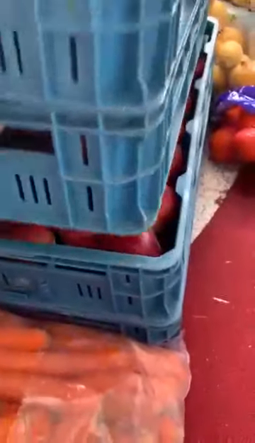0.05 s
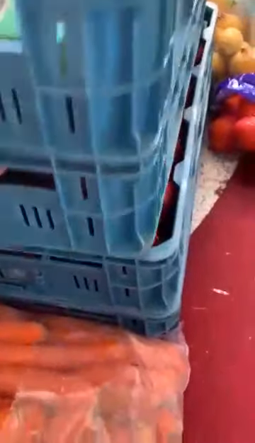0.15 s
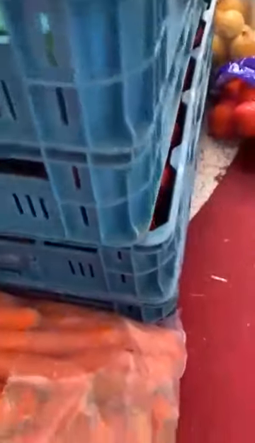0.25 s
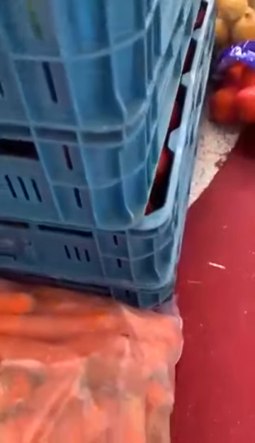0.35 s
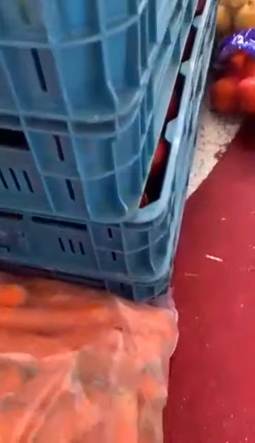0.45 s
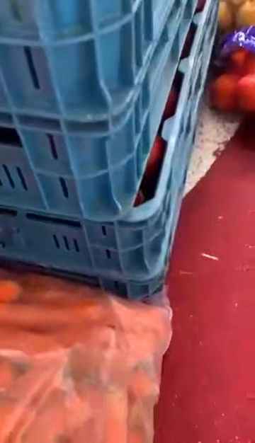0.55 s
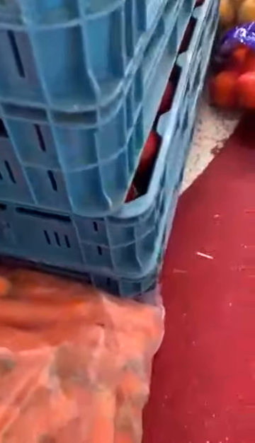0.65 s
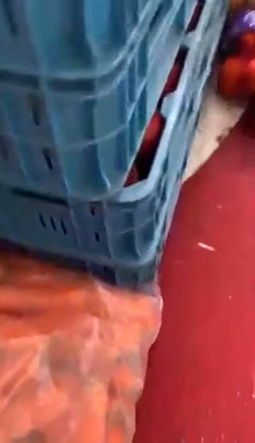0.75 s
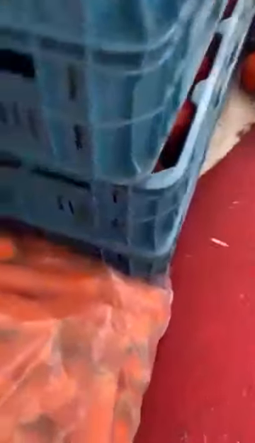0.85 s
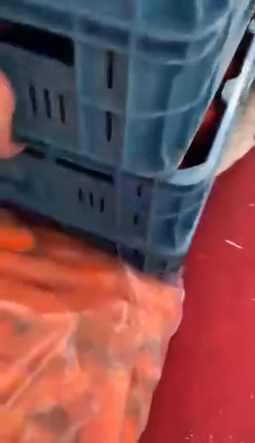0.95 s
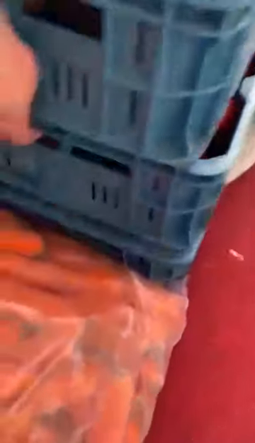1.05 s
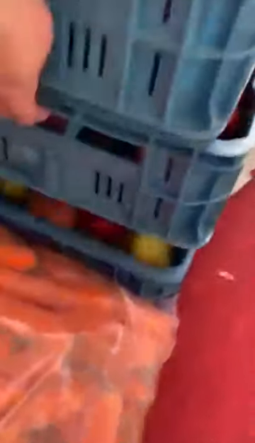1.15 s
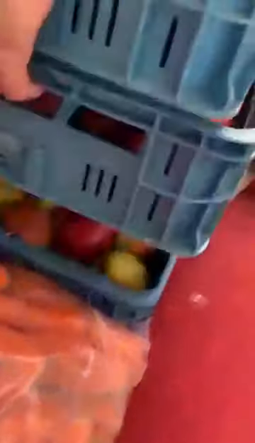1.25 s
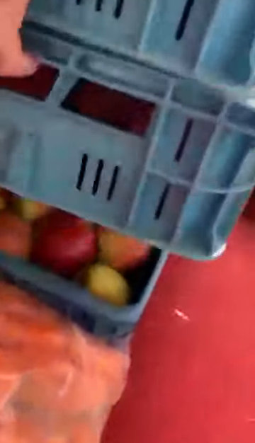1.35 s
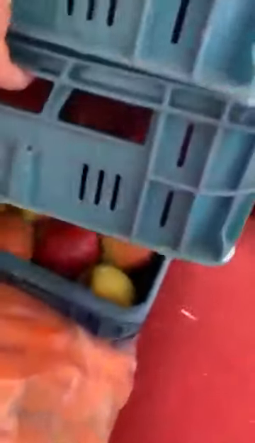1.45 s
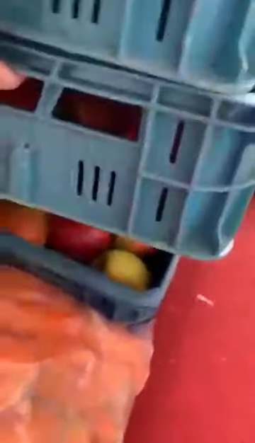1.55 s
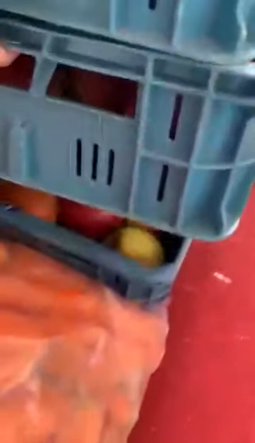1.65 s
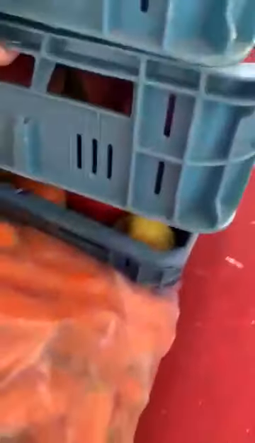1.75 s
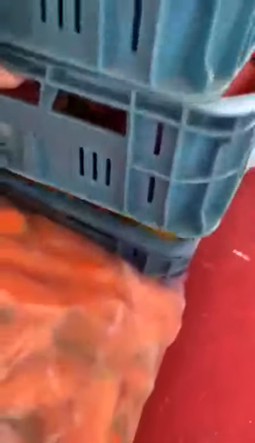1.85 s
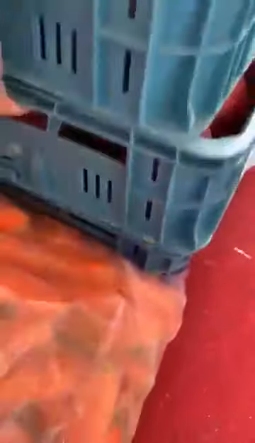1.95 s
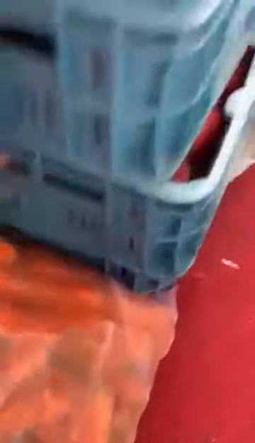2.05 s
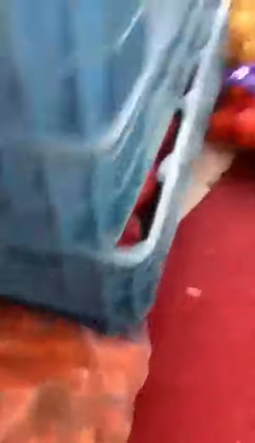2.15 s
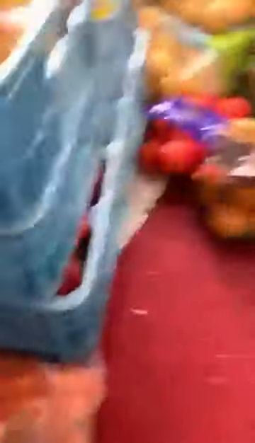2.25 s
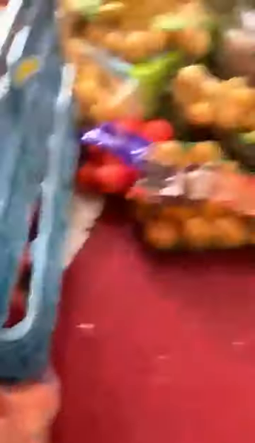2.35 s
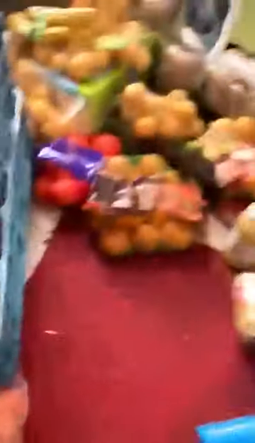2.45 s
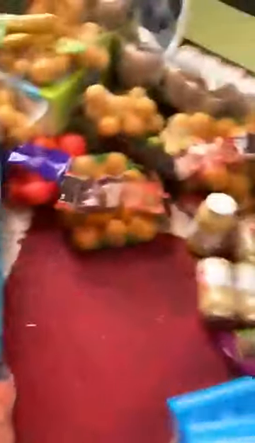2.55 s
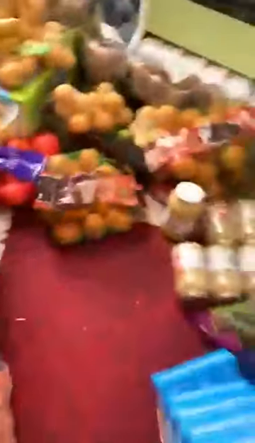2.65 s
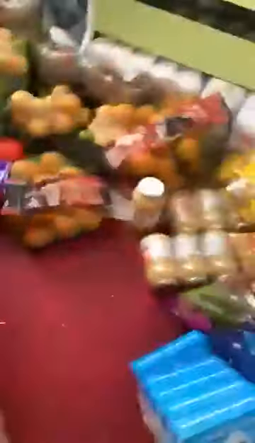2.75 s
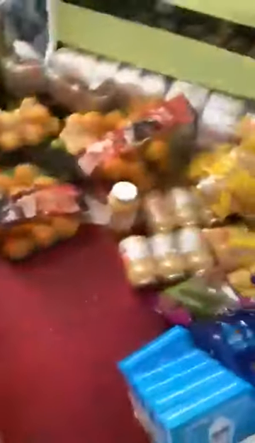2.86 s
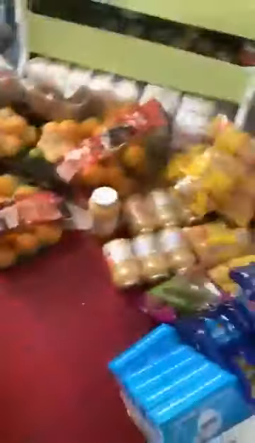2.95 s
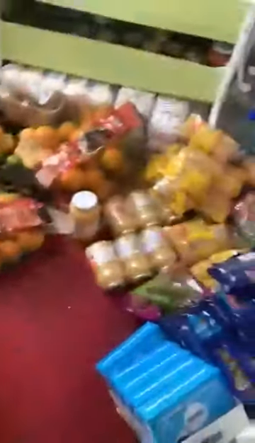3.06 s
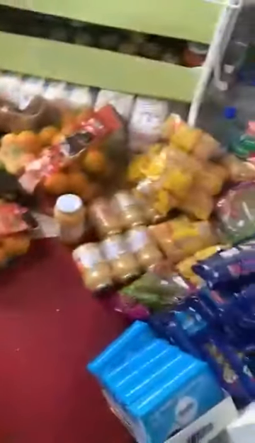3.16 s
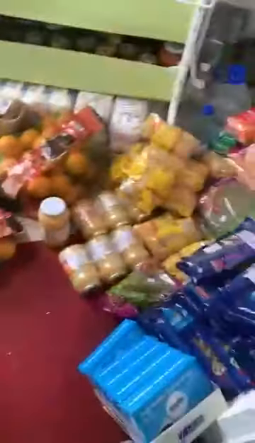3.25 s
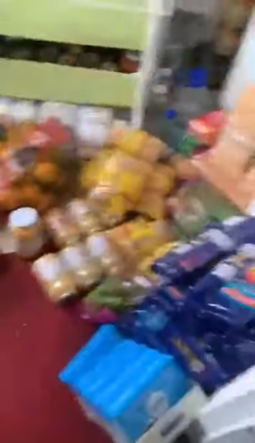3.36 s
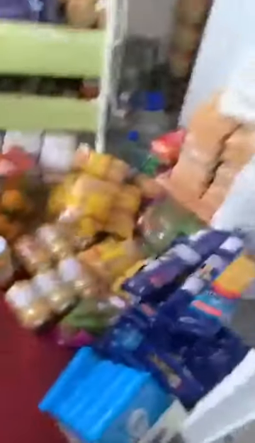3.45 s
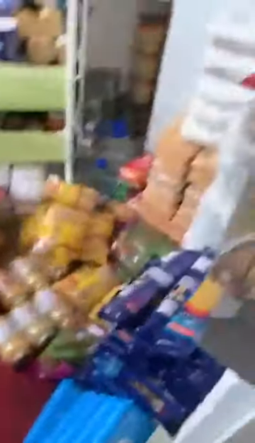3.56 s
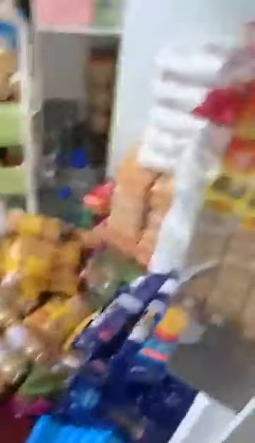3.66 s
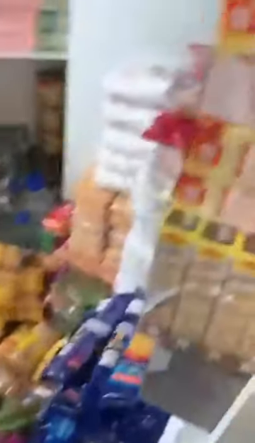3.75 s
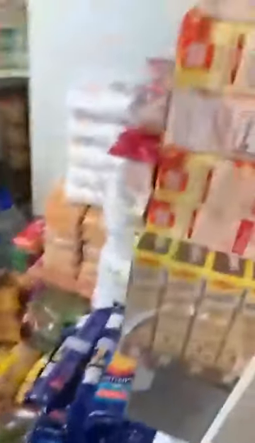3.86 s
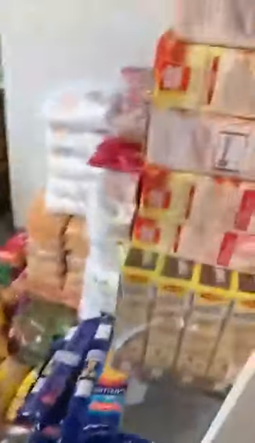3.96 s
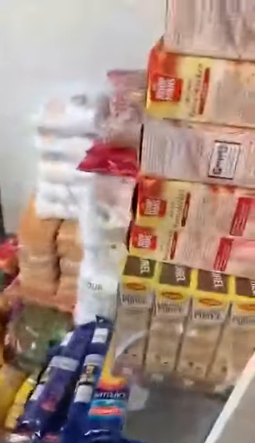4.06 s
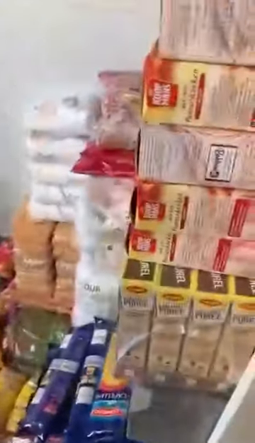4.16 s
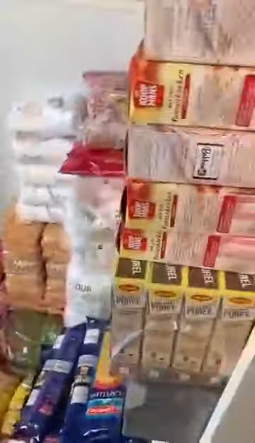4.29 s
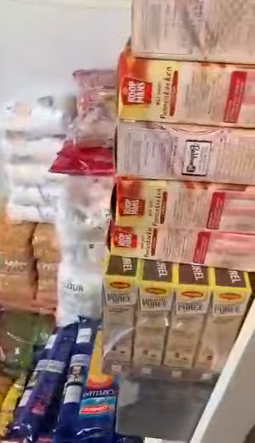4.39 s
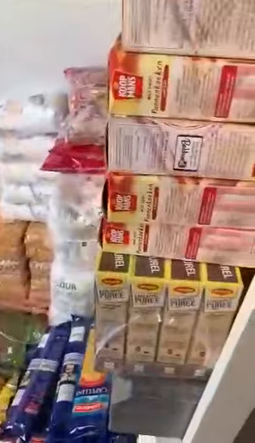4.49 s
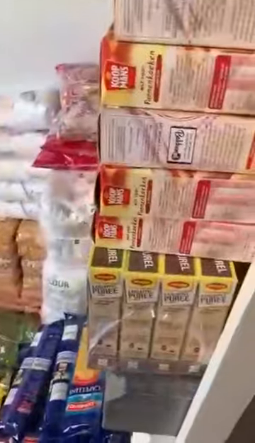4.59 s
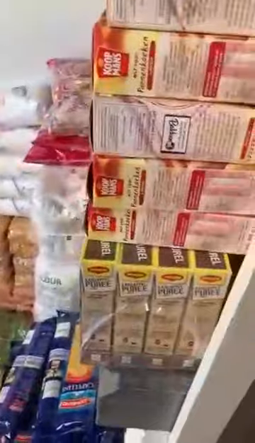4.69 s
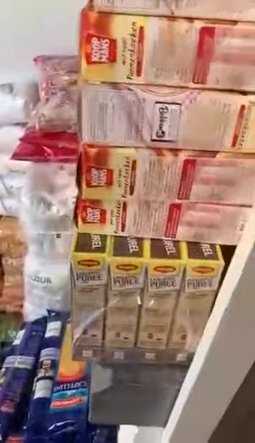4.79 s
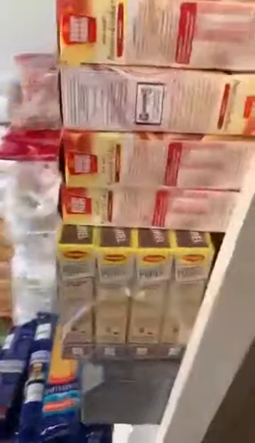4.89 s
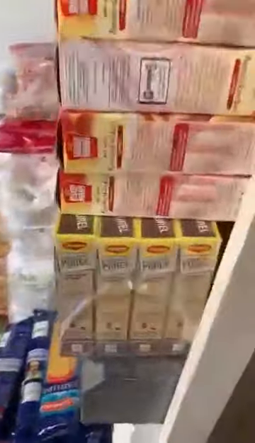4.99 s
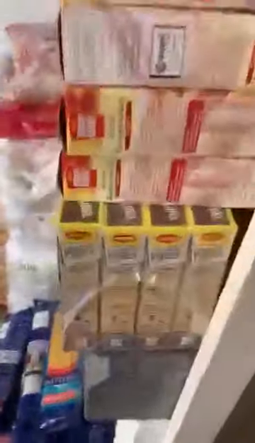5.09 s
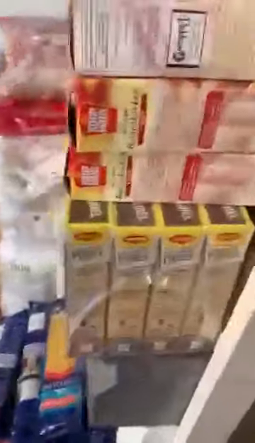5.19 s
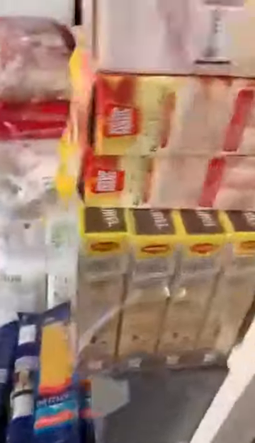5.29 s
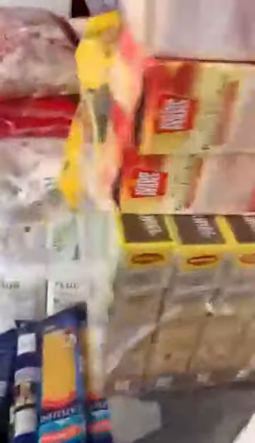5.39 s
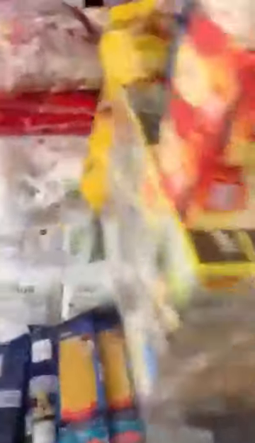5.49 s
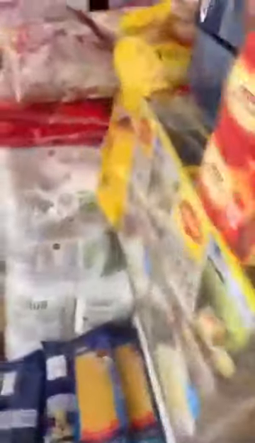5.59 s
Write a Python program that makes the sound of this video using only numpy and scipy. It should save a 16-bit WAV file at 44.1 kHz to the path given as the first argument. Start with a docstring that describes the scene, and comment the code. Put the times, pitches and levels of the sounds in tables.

```python
"""A small store room: stacked plastic produce crates are lifted, knocked together and dragged rim over rim.
Each contact sums decaying noise and wall modes into a thud of the loaded crate, a clack and a sharp crack;
a knock adds a bending wave and a panel note, and sliding is a stick-slip run of tiny contacts.
As the handling thins out, rustles, shuffling, a faint whistle and crinkling film remain, with two faint knocks.
Filtered noise makes the room tone and the rumble; a close pair of microphone ports hears it all."""
import sys
import numpy as np
from scipy import signal
from scipy.fft import rfft, irfft
from scipy.io import wavfile
from scipy.ndimage import uniform_filter1d

SR = 44100
rng = np.random.default_rng(int(sys.argv[2]) if len(sys.argv) > 2 else 0)


def wav_record(signal):
    """Record a signal, one row per channel, as 16-bit PCM in the file named by sys.argv[1]."""
    frames = np.transpose(np.atleast_2d(signal))
    bounded = np.clip(frames, -1, 1)
    # unit amplitude maps onto the largest positive 16-bit level
    quanta = np.round(bounded * 32767).astype(np.int16)
    wavfile.write(sys.argv[1], SR, quanta)


N = 248264  # length in samples


def gain_of(db):
    """Logarithmic level: turns decibels into an amplitude gain."""
    return 10 ** (np.asarray(db) / 20)


def evened(x):
    """Power normalisation: scales a signal to rms 1."""
    return x / np.sqrt(np.mean(x ** 2) + 1e-20)


def read(points, hz, axis=1):
    """Logarithmic pitch scale: joins one column of a table along a log-frequency axis."""
    columns = np.transpose(points)
    return np.interp(np.log(hz + 1), np.log(columns[0] + 1), columns[axis])


def add(mix, s, sound):
    """Superposition: adds a sound to the mix from a time in seconds."""
    part = mix[:, max(round(s * SR), 0):][:, :sound.shape[1]]
    part += sound[:, :part.shape[1]]


def level(curve):
    """Amplitude envelope: a curve of (s, dB), as a gain for every sample."""
    return gain_of(np.interp(np.arange(N) / SR, *np.transpose(curve)))


def decay(t, t60):
    """Exponential damping: the amplitude falls 60 dB in t60 seconds."""
    return np.exp(-np.log(1000) * t / np.maximum(t60, 1e-3))


def noise(spectrum, size, lumps_db=0, lump_hz=130):
    """Spectral shaping: two unrelated noises of one colour share the chance resonances of the struck spot."""
    hz = np.fft.rfftfreq(size, 1 / SR)
    spot = np.sqrt(hz * 1000) / lump_hz  # resonances widen towards the treble
    heights = np.clip(rng.standard_normal(256), -2, 2)
    lumps = np.interp(spot, np.arange(len(heights)), heights)
    shape = gain_of(read(spectrum, hz) + lumps_db * lumps)
    white = rng.standard_normal((2, size))
    return evened(irfft(rfft(white) * shape, size))


def drifting(colour, patchy_db, patch_s, patch_hz):
    """Time-frequency modulation: the bands of a coloured noise swell and fade in chance patches."""
    hz, t, z = signal.stft(noise(colour, N), SR, nperseg=1024, noverlap=768)
    patches = rng.standard_normal((len(t), len(hz))).T
    for _ in range(2):
        patches = uniform_filter1d(patches, max(round(patch_s / t[1]), 1), axis=1)
        patches = uniform_filter1d(patches, max(round(patch_hz / hz[1]), 1), axis=0)
    z = z * gain_of(patchy_db * np.clip(evened(patches), -2, 2))
    return evened(signal.istft(z, SR, nperseg=1024, noverlap=768)[1][:, :N])


# Reverberation of the room. Each row: frequency in Hz, decay time t60 in seconds.
ROOM_T60 = [(100, 0.31), (400, 0.24), (1200, 0.66), (2400, 1.3), (3900, 0.68), (7000, 1.1), (11000, 0.91)]


def room(x, gap=0.0035, build=0.0074):
    """Reverberation: a diffuse tail builds after a short gap (s) and dies at its own speed in each band."""
    hz, t, z = signal.stft(rng.standard_normal((2, SR)), SR, nperseg=256)
    z *= decay(t, read(ROOM_T60, hz)[:, None]) * np.clip((t - gap) / build, 0, 1)
    tail = signal.istft(z, SR, nperseg=256)[1]
    return signal.fftconvolve(x, tail / np.linalg.norm(tail[0]), axes=1)[:, :N]


# Spread of sound from all around. Each row: frequency in Hz, side minus mid level in dB.
WIDTH = [(60, -13), (110, -15.5), (190, -10.5), (340, -6.5), (610, 2.5), (1100, 3), (1960, 4.5),
         (3510, 2.5), (6270, -1), (11200, -7.5)]


def around(x):
    """Diffuse field: unrelated mid and side signals, narrow in the bass and wide above."""
    side = irfft(rfft(x[1]) * gain_of(read(WIDTH, np.fft.rfftfreq(N, 1 / SR))), N)
    return np.array([x[0] + side, x[0] - side])


# The port pair facing the crates; its differences fade out below 380 Hz.
# Each row: frequency in Hz, likeness from 0 to 1, left lead in radians.
PORTS = [(350, 0.96, 0.18), (650, 0.9, -0.5), (1193, 0.4, -.5), (2160, 0.5, -0.48), (2630, 0.6, 3),
         (3962, 0.3, 2), (4870, 0.97, 3), (5500, 1, 3.5), (6000, .93, 4.5), (7100, 0.4, 7.5),
         (9900, .95, 6.5), (10260, 1, 7.5), (11450, 1, 10)]
# Level balance of the ports. Each row: frequency in Hz, left minus right in dB.
LEAN = [(130, -1), (260, -.5), (560, 1), (1200, -1), (2500, -1.5), (5000, 0.03)]


def near(x):
    """Coherence of a close source: the ports hear the bass alike and the treble with shifting phase."""
    hz = np.fft.rfftfreq(2 * N, 1 / SR)
    short_waves = hz ** 6 / (hz ** 6 + 380 ** 6)  # only these differ between the ports
    likeness = 1 - short_waves * (1 - np.clip(read(PORTS, hz), 0, 1))
    lead = short_waves * read(PORTS, hz, axis=2)
    common, apart = rfft(x, 2 * N) * np.sqrt([(1 + likeness) / 2, (1 - likeness) / 2])
    lean = gain_of(read(LEAN, hz) / 2)
    left = (common + apart) * lean
    right = (common - apart) * np.exp(-1j * lead) / lean
    return irfft(np.array([left, right]))[:, :N]


# Colour of the room tone. Each row: frequency in Hz, relative density in dB per Hz.
AIR = [(25, -14.5), (50, -3.5), (90, 2), (150, -8.5), (300, -10), (700, -18.5), (1600, -27.5), (2700, -38),
       (3900, -40), (5200, -49), (7000, -43), (11000, -49)]
AIR_DB = -58.5


def room_tone():
    """Stationary background noise: a low tone of the room whose bands swell and fade slightly."""
    return gain_of(AIR_DB) * drifting(AIR, patchy_db=2.5, patch_s=0.064, patch_hz=200)


# Deep rumble over time. Each row: time in seconds, level in dB.
RUMBLE = [(0, -60.5), (1.901, -51), (2.2, -53), (2.6, -66), (3.6, -65.5), (4.2, -75), (4.9, -66.5)]
# Its colour. Each row: frequency in Hz, relative density in dB per Hz.
RUMBLE_COLOUR = [(20, -10.5), (55, 0), (100, -4), (180, -20), (600, -59.5)]


def rumble():
    """Low-frequency noise, alike at both ports: it comes and goes as the microphone is carried about."""
    return level(RUMBLE) * noise(RUMBLE_COLOUR, N)[0]


# Low shuffling over time. Each row: time in seconds, level in dB.
SHUFFLE = [(2.5, -75), (2.9, -61), (3.1, -65.5), (3.37, -68), (3.6, -66.5), (4.35, -64), (4.6, -74.5),
           (5.15, -63.5), (5.63, -68)]
# Its colour. Each row: frequency in Hz, relative density in dB per Hz.
SHUFFLE_COLOUR = [(70, -18), (160, 2.5), (280, 2.5), (520, -6.5), (900, -17), (2000, -38)]
# Soft high swish over time. Each row: time in seconds, level in dB.
SWISH = [(2.15, -77), (2.42, -68), (2.95, -76), (3.15, -93), (3.44, -103.5), (3.52, -68), (3.82, -75),
         (4.6, -97.5)]
# Its colour. Each row: frequency in Hz, relative density in dB per Hz.
SWISH_COLOUR = [(2700, -14), (3400, 0.5), (4400, 0), (5000, -18), (6500, -14.5), (11000, -21.5)]


def movement():
    """Friction noise of moving about the room: a low patchy shuffling and a soft high swish."""
    low = level(SHUFFLE) * drifting(SHUFFLE_COLOUR, patchy_db=3.5, patch_s=0.043, patch_hz=90)
    return low + level(SWISH) * noise(SWISH_COLOUR, N)


WHISTLE_START_S, WHISTLE_END_S, WHISTLE_HZ, WHISTLE_DB = 3.5, 3.99, 1707, -77
WHISTLE_WIDTH_HZ = 45  # falloff to either side of its pitch; makes pitch and strength waver


def whistle():
    """Narrow-band noise: a faint, wavering thin tone swells and fades once."""
    t = np.arange(N) / SR
    arch = np.sin(np.pi * np.clip((t - WHISTLE_START_S) / (WHISTLE_END_S - WHISTLE_START_S), 0, 1))
    band = np.exp(-((np.fft.rfftfreq(N, 1 / SR) - WHISTLE_HZ) / WHISTLE_WIDTH_HZ) ** 2)
    tone = evened(irfft(rfft(rng.standard_normal((2, N))) * band, N))
    return gain_of(WHISTLE_DB) * arch * tone


# Crinkling wrapping film over time. Each row: time in seconds, level in dB.
CRINKLE = [(4.85, -105), (4.95, -71.5), (5.1, -77), (5.22, -68.5), (5.3, -66), (5.42, -64), (5.52, -69),
           (5.63, -79)]
# Its colour. Each row: frequency in Hz, relative density in dB per Hz.
CRINKLE_COLOUR = [(500, -13.5), (1500, 2), (2700, -2), (4200, 3.5), (5300, -13), (7000, -2), (9500, -9),
                  (11500, -18)]


def crinkle(snaps_per_s=1300, spread_db=2.0, snap_t60_s=.05, size=2048):
    """Buckling: wrapping film gives way in many tiny snaps of uneven size, whose powers add up."""
    sizes = gain_of(spread_db * np.minimum(rng.exponential(1, N), 3))
    snaps = sizes * (rng.random(N) < snaps_per_s / SR)
    fade = decay(np.arange(size) / SR, snap_t60_s)
    power = signal.oaconvolve(snaps ** 2, fade ** 2)[:N]
    texture = drifting(CRINKLE_COLOUR, patchy_db=0.5, patch_s=.035, patch_hz=400)
    return level(CRINKLE) * evened(np.sqrt(abs(power))) * texture


# Soft scuffs and ticks further off. Each row: start in seconds, level in dB, peak in Hz, height of the
# peak in dB, body in dB, treble in dB, rise in seconds, t60 in seconds.
RUSTLES = [(3.481, -48.5, 1680, 10, 5.5, -6, 0.017, 0.22), (4.122, -57, 1460, 3.5, -8, -0.5, 0.0019, 0.21),
           (4.174, -51, 1763, 0, 2, -7, 0.0097, 0.2), (4.271, -53, 1700, 6, -23, -6, 0.0038, 0.11),
           (4.282, -41, 1643, 5.5, -7.5, 6, 0.001, 0.13), (4.726, -47.5, 1146, 12, 13, 2, 0.012, 0.19),
           (5.256, -48.5, 1307, 6.5, 5, -3, 0.0092, 0.19), (5.262, -54, 2890, 22, -4, 0, 0.01, 0.21),
           (5.46, -57, 1254, -4, 5, -5, 0.0092, 0.22)]
# Colour common to all scuffs. Each row: frequency in Hz, relative density in dB per Hz.
SCUFF = [(60, -12), (300, -7), (800, -4.5), (1400, -1), (2600, -9.5), (3700, -8.5), (5200, -21),
         (7500, -14), (11000, -36.5)]
PEAK_OCTAVES = 0.17  # half-width of a scuff's resonance, at half its height in dB
BODY_HZ, TREBLE_HZ = 800, 4170  # below and above these a scuff's body and treble count


def rustles(grain_db=1.5, size=16384):
    """Resonant friction noise: short grainy puffs, each with one peak and its own body and treble."""
    t, out = np.arange(size) / SR, np.zeros((2, N))
    f = np.geomspace(40, 12000, 200)
    for s, db, hz, height, body, treble, rise, t60 in RUSTLES:
        peak = height / (1 + (np.log2(f / hz) / PEAK_OCTAVES) ** 2)
        shelves = body / (1 + (f / BODY_HZ) ** 4) + treble / (1 + (TREBLE_HZ / f) ** 4)
        colour = np.transpose([f, read(SCUFF, f) + peak + shelves])
        grain = gain_of(grain_db * evened(uniform_filter1d(rng.standard_normal(size), 150)))
        puff = evened(noise(colour, size, lumps_db=3.5, lump_hz=49.84) * grain)
        swell = (1 - np.exp(-(t / rise) ** 2)) * decay(t, t60)
        add(out, s, gain_of(db) * puff * swell / swell.max())
    return out


# The crate's crowded short resonances, deep, middle and high.
# Each row: frequency in Hz, relative density in dB per Hz.
THUD = [(25, -27.5), (60, -8.5), (110, 2.5), (180, 0.5), (260, 1), (400, -9), (520, -18), (900, -43.5)]
CLACK = [(250, -41.5), (430, -1.5), (540, 6), (820, -3.5), (1030, 2.5), (1350, -1.5), (2100, -6),
         (2800, -15.5), (4400, -14), (6500, -42.5)]
CRACK = [(1000, -30), (2400, 8), (3400, 2.5), (5000, 1.5), (6400, 2.5), (7600, 2.5), (9000, 0),
         (10500, -4.5), (11600, 0.5)]
# How thud, clack and crack swell and die.
# Each row: rise in seconds, t60 in seconds before the ring factor.
ENVELOPES = [(0.0027, 0.18), (0.00019, 0.17), (0.00078, 0.13)]
# Crate wall modes. Each row: frequency in Hz, relative level in dB, t60 in seconds before the ring factor.
MODES_OF_CRATE = [(173, 2.5, 0.15), (215.3, -2, 0.22), (245.4, -8, 0.18), (353.8, -1, 0.28),
                  (410.5, -1.5, 0.12), (517.7, -7, 0.38), (682, -3, 0.078), (953, -8.5, 0.2),
                  (1019.3, 0, 0.049), (1175, -9, 0.2), (1346, -8.5, 0.14), (1553, -11, 0.24),
                  (1678, -11.5, 0.29), (1870, -13.5, 0.058), (2190, -12.5, 0.12), (2420, -21, 0.4),
                  (3320, -17, 0.15)]
SNAP_DB, SNAP_S = 0, 0.005  # the first instant of a crack stands out above its ring


def contact(ring, modes_db=-7, lumps_db=(5, 6.5, 4), size=20480):
    """Modal excitation: thud, clack and crack of one contact, each of rms 1 over its first 20 ms."""
    t = np.arange(size) / SR
    parts = []
    for colour, lumps, (_, t60) in zip((THUD, CLACK, CRACK), lumps_db, ENVELOPES):
        parts.append(noise(colour, size, lumps, lump_hz=54.85) * decay(t, t60 * ring))
    parts = np.array(parts)
    for hz, db, t60 in MODES_OF_CRATE:
        # each place of contact wakes the wall modes differently; the low ones belong to the thud
        detuned = hz * (1 + 0.0028 * rng.standard_normal())
        phase = 2 * np.pi * (detuned * t + rng.random((2, 1)))
        strength = gain_of(db + modes_db) * (.5 + rng.random())
        parts[int(hz > 450)] += strength * np.sin(phase) * decay(t, t60 * ring)
    parts[2] *= 1 + gain_of(SNAP_DB) * np.exp(-t / SNAP_S)
    for part, (rise, _) in zip(parts, ENVELOPES):
        part *= 1 - np.exp(-(t / rise) ** 2)
        part /= np.sqrt(np.mean(part[:, :SR // 50] ** 2, axis=1, keepdims=True))
    return parts


# Dry ticks of a plastic edge. Each row: start in seconds, level in dB before the doubling in ticks().
TICKS = [(1.525, -36), (1.8497, -26.5), (1.978, -37), (2.004, -38.5), (2.22, -52.5), (5.2306, -59)]
TICK_T60_S = 0.044


def ticks(size=4096):
    """Impulsive excitation: an edge flicks past a rib, all crack and no weight."""
    t, out = np.arange(size) / SR, np.zeros((2, N))
    for s, db in TICKS:
        crack = noise(CRACK, size, lumps_db=1.5) * decay(t, TICK_T60_S)
        add(out, s, 2 * gain_of(db) * crack)
    return out


# Drags of rim over rim. Each row: start of full speed in seconds, length in seconds, friction in dB,
# load on the crate in dB.
DRAGS = [(0, 0.0048, -35, -0.5), (0.224, 0.017, -25, 3), (0.411, 0.048, -40.5, 3), (0.63, 0.01, -48.5, -4),
         (0.925, 0.014, -50.5, 0), (1.02, 0.12, -42, -4), (1.264, 0.14, -26, -0.5), (1.376, 0.048, -26, -4),
         (1.47, 0.04, -33, -3), (1.856, 0.023, -26, -7), (1.931, 0.051, -35.5, -1), (2.12, 0.04, -55, 2)]
GRIP_DB_PER_S, EASE_DB_PER_S = 420.5, 132.5  # a drag builds quickly and runs out slowly
SHARP_DB, DULLING = -4.5, 0.87  # crack of an unloaded slip, and the dB it loses per dB of load
LIGHTEN_DB_PER_S = 14  # the hands take the weight as a drag runs out
GRAZE_DB, GRAZE_DB_PER_S = -7.5, 1701  # the rims graze each other for an instant around each knock


def drag_force():
    """Dry friction: drags grip, hold and run out, forcing thud, clack and crack; load deepens and dulls."""
    t, power = np.arange(N) / SR, np.zeros((3, N))
    for s, length, db, weight in DRAGS:
        before, after = np.maximum(s - t, 0), np.maximum(t - s - length, 0)
        friction = db - GRIP_DB_PER_S * before - EASE_DB_PER_S * after
        load = weight - LIGHTEN_DB_PER_S * after
        power += gain_of([friction + load, friction, friction + SHARP_DB - DULLING * load]) ** 2
    for s, db, weight, sharpness, _ in KNOCKS:
        close = abs(t - s) < .04
        graze = db + GRAZE_DB - GRAZE_DB_PER_S * abs(t[close] - s)
        power[:, close] += gain_of([graze + weight, graze, graze + sharpness]) ** 2
    return np.sqrt(power)


CATCH_DB, CATCH_S = 1.5, .014  # the ribs catch and let go during a drag


def slide(slips_per_s=700, spread_db=3, ring=0.72, shift_db=5, count=5):
    """Stick-slip: tiny contacts of uneven size, as the weight shifts between a few places along the rim."""
    force, out = drag_force(), np.zeros((3, 2, N))
    catches = evened(uniform_filter1d(rng.standard_normal(N), round(CATCH_S * SR)))
    force = force * evened(gain_of(CATCH_DB * np.clip(catches, -2, 2)))
    shifts = evened(uniform_filter1d(rng.standard_normal((count, N)), 2500))
    shares = gain_of(shift_db * shifts)
    for share in shares / np.linalg.norm(shares, axis=0):
        sizes = gain_of(spread_db * np.minimum(rng.exponential(1, N), 3))
        signs = rng.choice([-1, 1], N)
        happens = rng.random(N) < slips_per_s / count / SR
        slips = share * evened(sizes * signs * happens)
        body = contact(ring, modes_db=-6)
        body /= np.linalg.norm(body, axis=2, keepdims=True)
        out += signal.oaconvolve((slips * force)[:, None], body, axes=2)[..., :N]
    return out.sum(0)


# Colour of the bending wave. Each row: frequency in Hz, relative density in dB per Hz.
BEND = [(50, -23), (130, -4.5), (260, 1.5), (600, -2), (1000, -6.5), (1700, -8), (2400, -15.5),
        (3200, -24.5), (6000, -40)]
BEND_DELAY_S, BEND_HZ = .01, 249.4  # its delay at this pitch; the treble comes sooner


def bending_wave(size=20480):
    """Dispersion: a blow spreads along the wall treble first, a falling chirp with the energy of 20 ms at rms 1."""
    hz = np.fft.rfftfreq(size, 1 / SR)
    turns = 2 * BEND_DELAY_S * np.sqrt(BEND_HZ * hz)
    wave = irfft(gain_of(read(BEND, hz)) * np.exp(-2j * np.pi * turns), size)
    return wave / np.linalg.norm(wave) * np.sqrt(SR / 50)


PANEL_T60_S, PANEL_RISE_S = 0.12, .002


def panel(hz, size=20480):
    """Damped resonance: the note of the wall panel that takes the blow."""
    t = np.arange(size) / SR
    phase = 2 * np.pi * (hz * t + rng.random((2, 1)))
    return 2 * np.sin(phase) * (1 - np.exp(-(t / PANEL_RISE_S) ** 2)) * decay(t, PANEL_T60_S)


# Crate knocks. Each row: start in seconds, strength in dB, weight of the load behind it in dB,
# sharpness of the edge in dB, note of the struck panel in Hz.
KNOCKS = [(0, -14, -2, -12.5, 205.2), (.1845, -12, -7, -4, 1006), (.199, -16, -5, -7, 1049),
          (0.276, -12, -2, -7.5, 533), (.298, -21.5, 2, -12, 228.4), (.318, -30, 3.5, -12.5, 269),
          (.376, -41.5, 15.5, -8, 248.8), (.405, -44, 11.5, -7.5, 174.5), (.452, -42, 12, -3.5, 272),
          (.564, -47.5, -12, -14.5, 2250), (.617, -31, -1.5, -10.5, 228), (0.912, -41.5, -9, -4.5, 990),
          (1.027, -42, -5, 0.5, 320.9), (1.05, -37, -2.5, 4.5, 222.4), (1.084, -40.5, -3, 5, 272),
          (1.252, -30.5, 7.5, -18, 523), (1.276, -14, 0, -12, 231), (1.324, -13, 0, -10, 227.4),
          (1.356, -20.5, 0, 3, 352.6), (1.366, -15.5, -1, -12, 568.8), (1.401, -19, -5, -12, 361.7),
          (1.418, -15, -6, -15, 510), (1.437, -25, 0, -10.5, 355), (1.484, -28.5, 2, -8, 483.4),
          (1.531, -34.5, 5, -6, 450.7), (1.581, -38.5, -3.5, -8, 1356), (1.598, -46.5, 2.5, 8.5, 262.8),
          (1.648, -51.5, -6.5, 3.5, 1964), (1.766, -43.5, -14, 1, 621), (1.796, -46.5, 0.5, 1, 982.5),
          (1.839, -39, -5.5, 6.5, 543), (1.862, -23, -7.5, -4.5, 1643), (1.893, -27, -1.5, 3.5, 530),
          (1.911, -24, -4, -1, 517), (1.93, -28, -9, -12.5, 366.6), (1.985, -41, -2, -6, 500),
          (2.194, -45, 2, 3, 306), (2.285, -71.5, 22.5, -14, 328), (2.478, -62.5, -15, -5, 1290),
          (2.622, -53.5, 4, -18, 376), (5.12, -61, 6.5, -10, 215), (5.23, -58, 6.5, -14, 245)]
KNOCK_RING = 0.54  # ring time of a knock, as a factor
LOAD_LAG_S = .006  # the fruit lands just after the rim does
LOAD_CLACK_DB = -11.5  # and shakes the walls again, relative to the knock's strength
BEND_DB, BEND_LOSS = -7.5, 0.38  # blunt blows flex the wall most: dB lost per dB of sharpness
PANEL_DB, PANEL_PER_LOAD = -5, 0.95  # gain on the panel's note, and dB it gains per dB of extra weight


def knocks(rim_thud_db=-8, load_db=-2.5, clack_db=-4, crack_db=0):
    """Impact: the rim strikes first, bends the wall and rings a panel, then the load lands."""
    out = np.zeros((2, N))
    for s, db, weight, sharpness, hz in KNOCKS:
        rim = gain_of([weight + rim_thud_db, clack_db, sharpness + crack_db])
        load = gain_of([weight + load_db, LOAD_CLACK_DB])
        bend = gain_of(BEND_DB - BEND_LOSS * sharpness) * bending_wave()
        note = gain_of(PANEL_DB + PANEL_PER_LOAD * max(weight, 0)) * panel(hz)
        strike = np.tensordot(rim, contact(KNOCK_RING), 1)
        landing = np.tensordot(load, contact(KNOCK_RING)[:2], 1)  # thud and clack only
        add(out, s, gain_of(db) * (strike + bend + note))
        add(out, s + LOAD_LAG_S, gain_of(db) * landing)
    return out


LOW_CUT_HZ = 42  # the crates are too small to radiate below this


def scene():
    """Direct and reverberant fields: crates close by, rustles further off, all in one room."""
    low_cut = signal.butter(2, LOW_CUT_HZ, "high", fs=SR, output="sos")
    crates = signal.sosfilt(low_cut, knocks() + ticks() + slide())
    far = rustles() + crinkle() + whistle()
    close = near(crates + gain_of(-21.0) * room(crates))
    reverberant = room(gain_of(-37.0) * crates + gain_of(-16.0) * far)
    diffuse = far + reverberant + movement() + room_tone()
    return close + around(diffuse) + rumble()


EDGE_HZ = 11450  # upper band limit


def record(dry):
    """Saturation and band limiting: the loudest peaks are rounded, then the top treble is cut."""
    pair = dry / (1 + (dry / .95) ** 6) ** (1 / 6)
    low_pass = signal.firwin(401, EDGE_HZ, window=("kaiser", 8), fs=SR)
    return signal.oaconvolve(pair, low_pass[None], "same")


dry = scene()
out = record(dry)
wav_record(out)
```